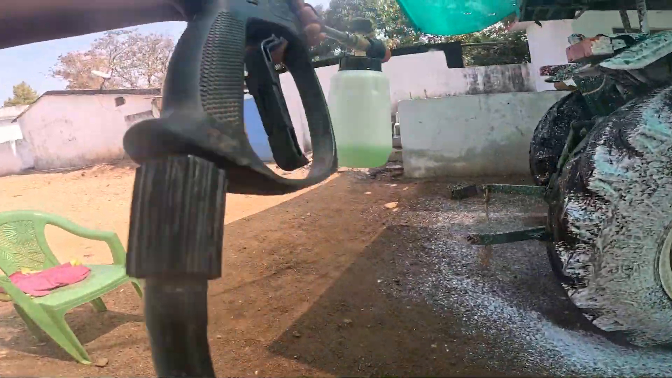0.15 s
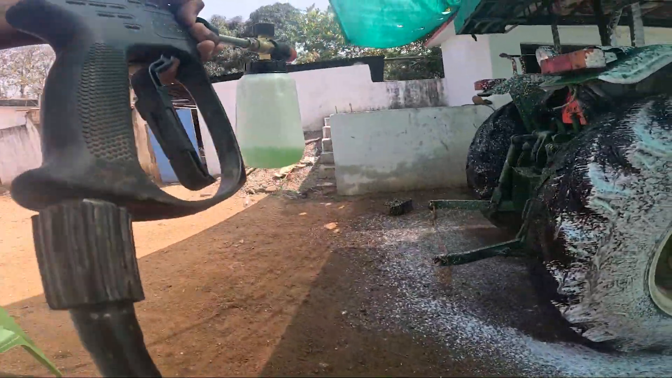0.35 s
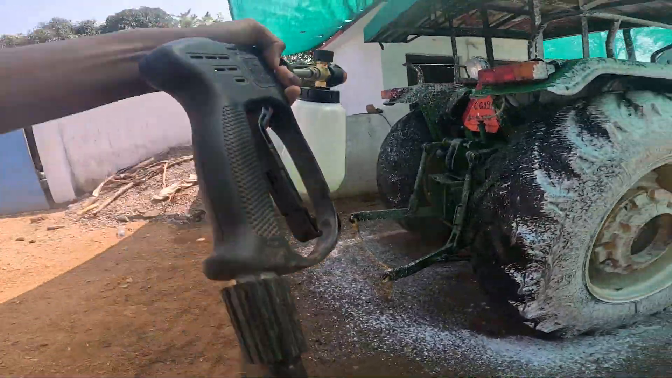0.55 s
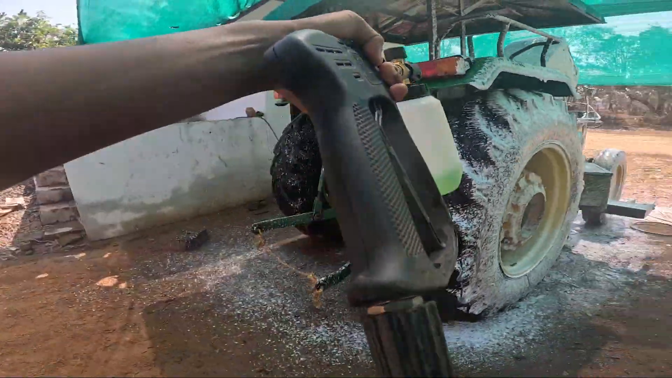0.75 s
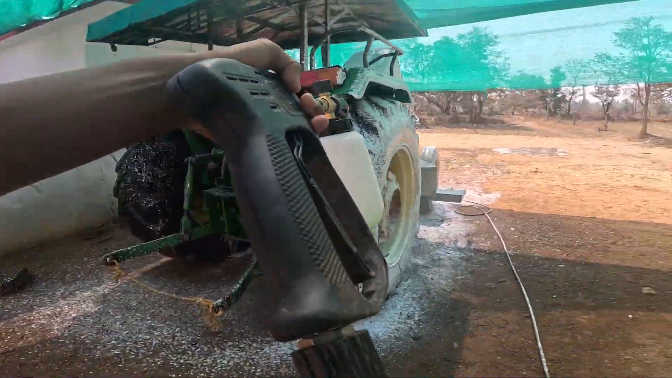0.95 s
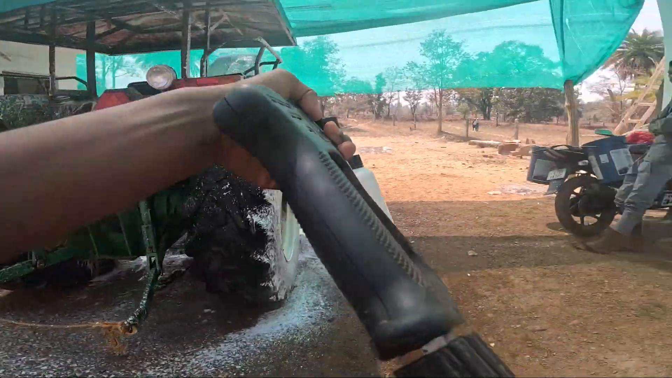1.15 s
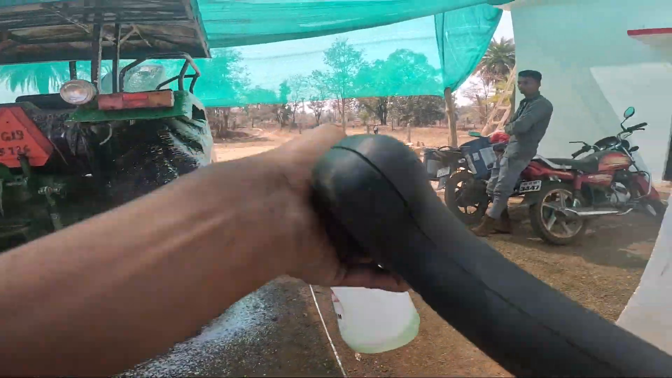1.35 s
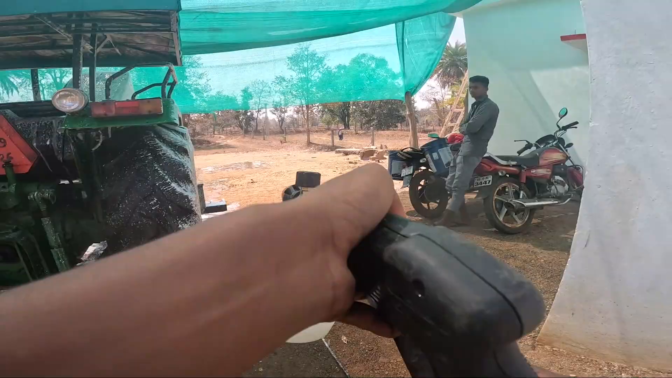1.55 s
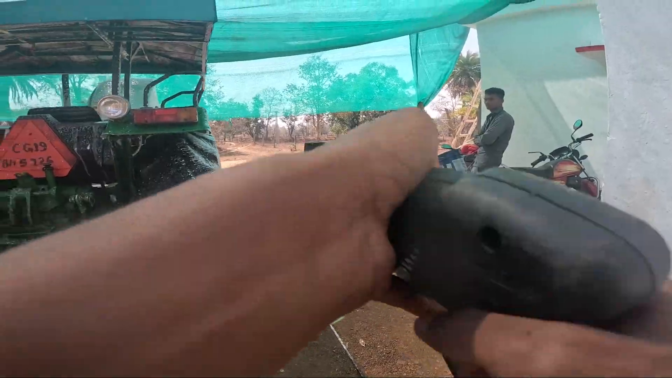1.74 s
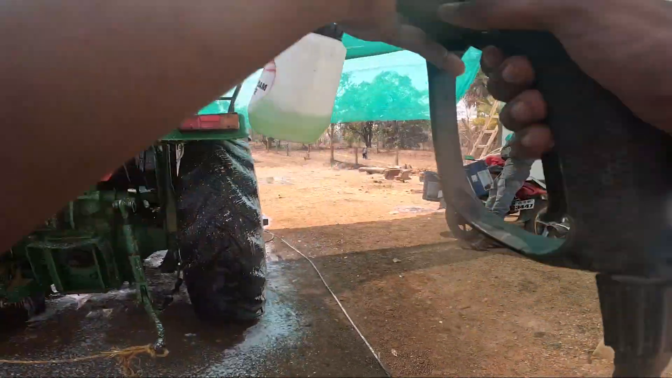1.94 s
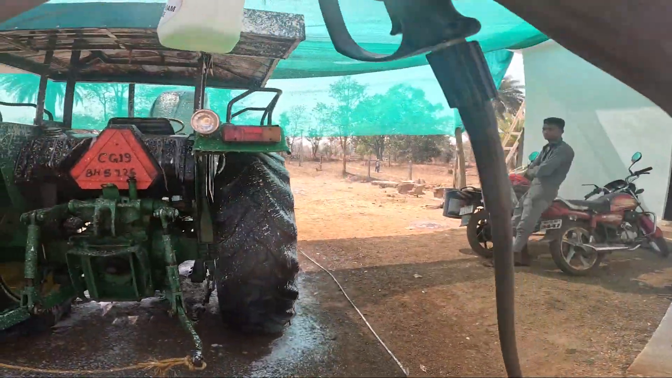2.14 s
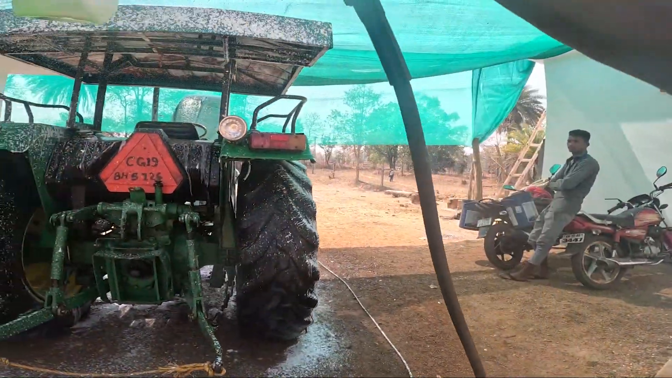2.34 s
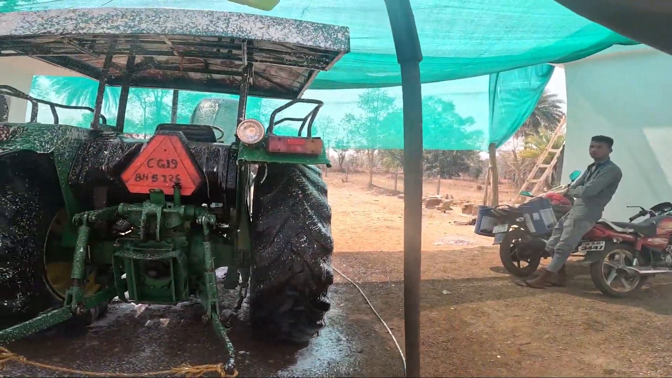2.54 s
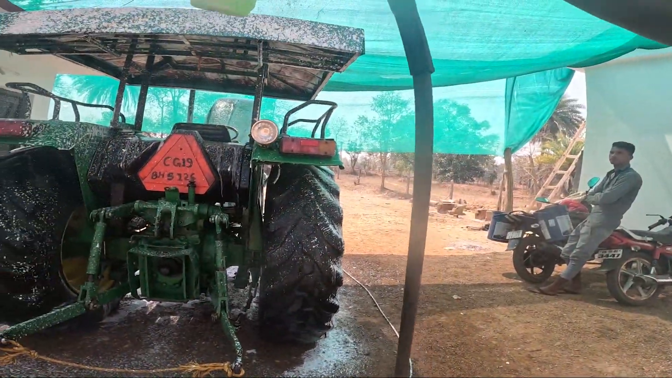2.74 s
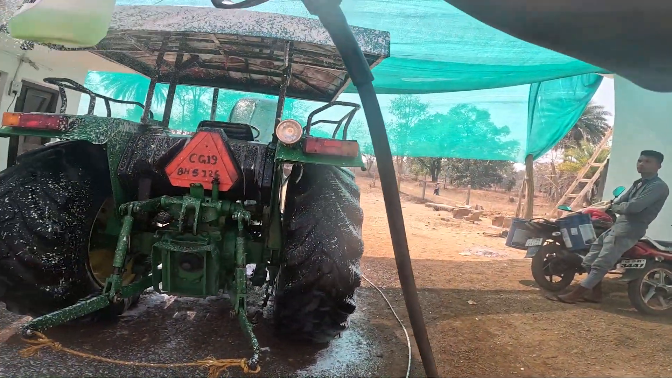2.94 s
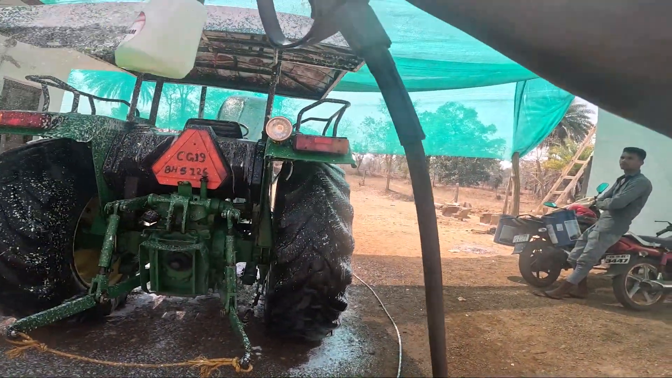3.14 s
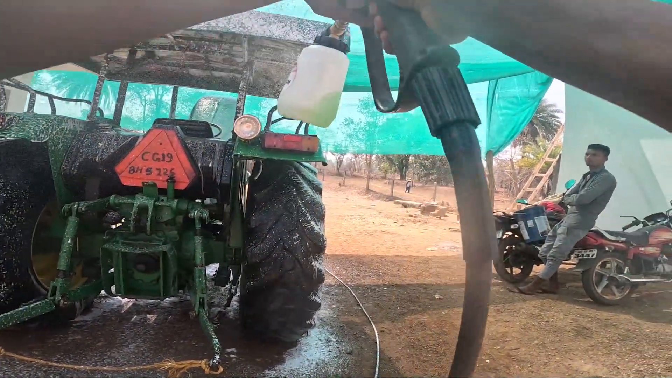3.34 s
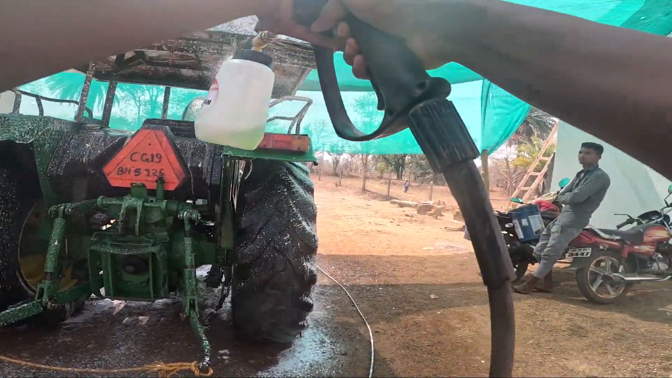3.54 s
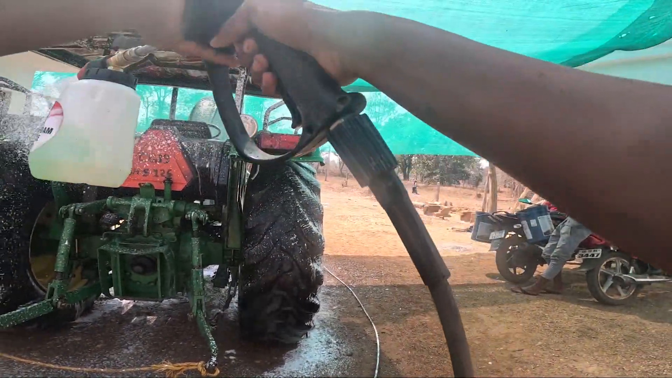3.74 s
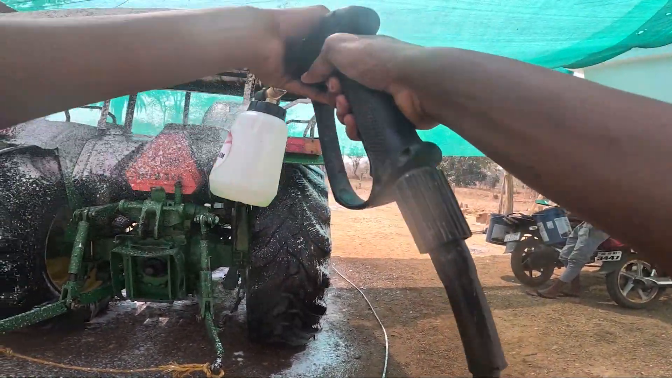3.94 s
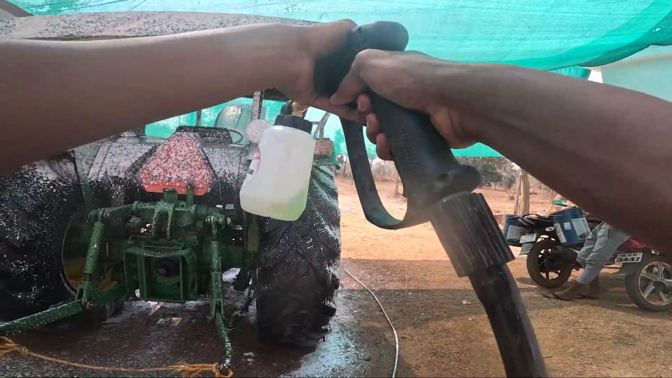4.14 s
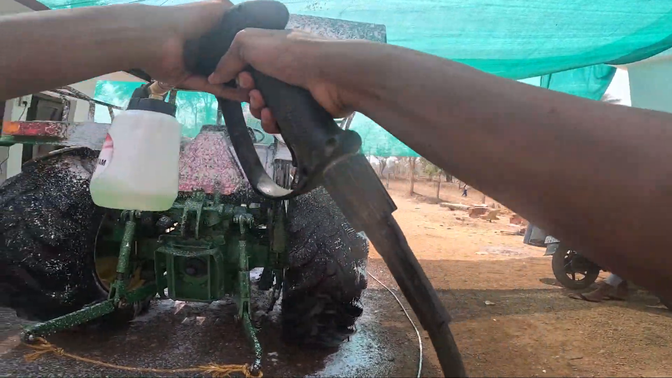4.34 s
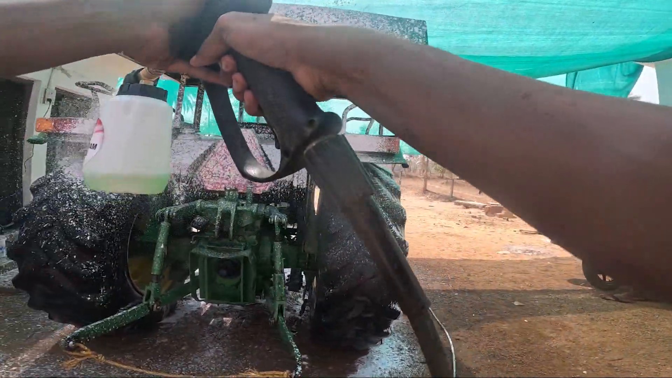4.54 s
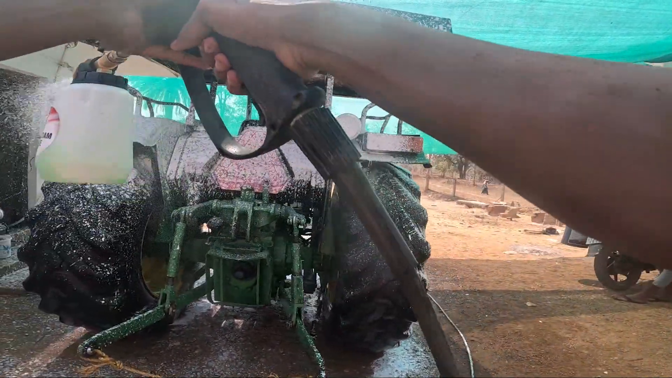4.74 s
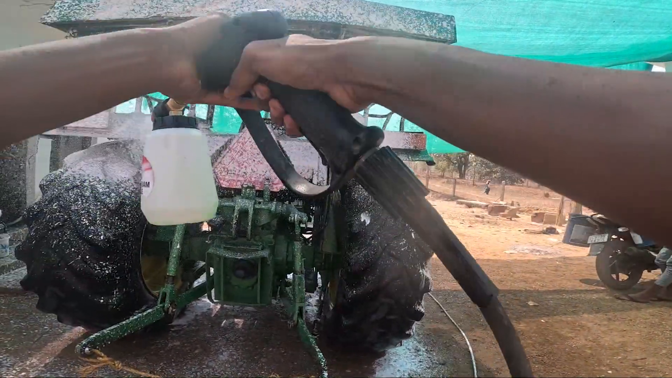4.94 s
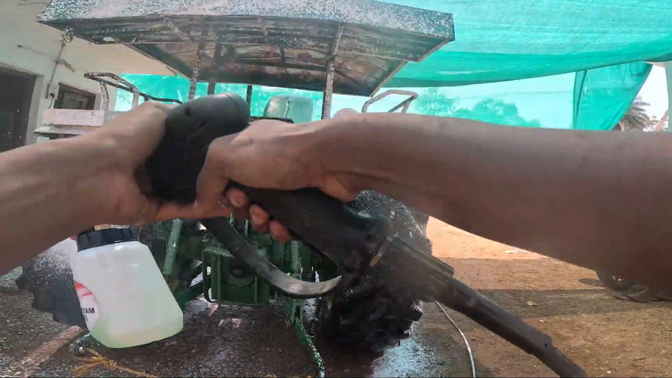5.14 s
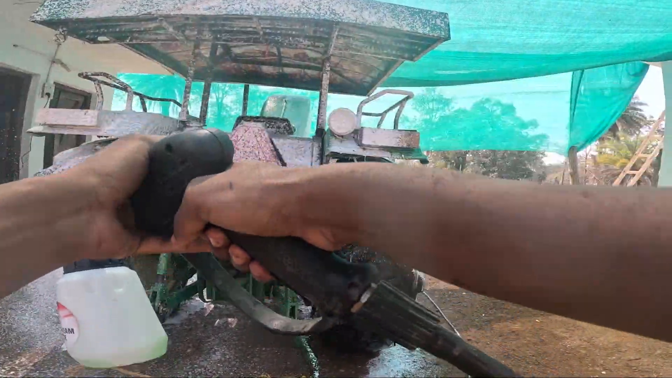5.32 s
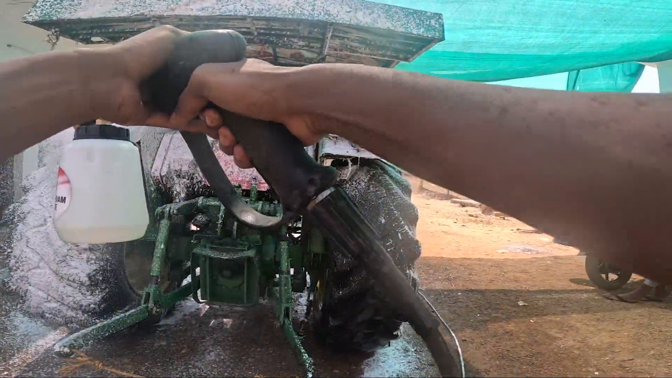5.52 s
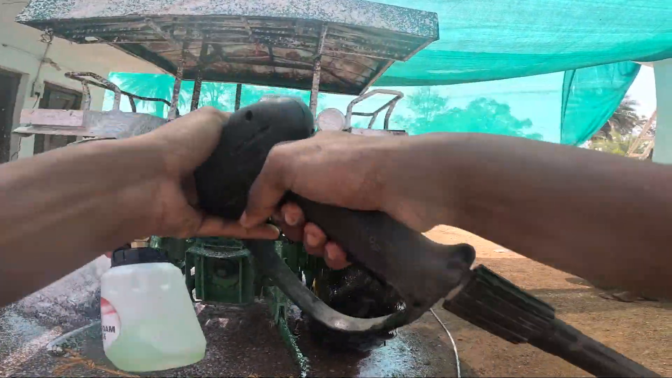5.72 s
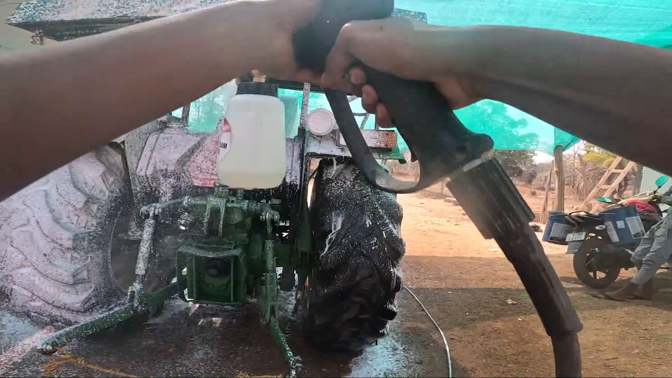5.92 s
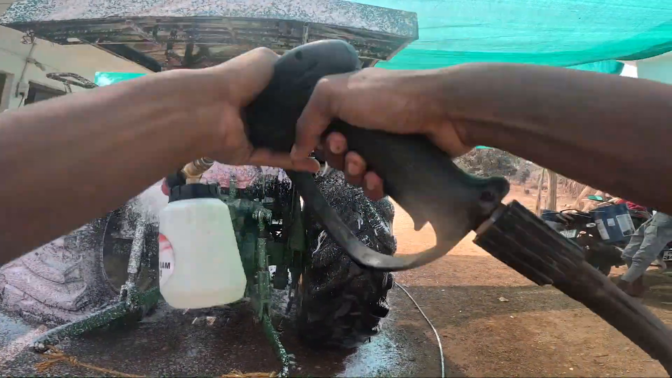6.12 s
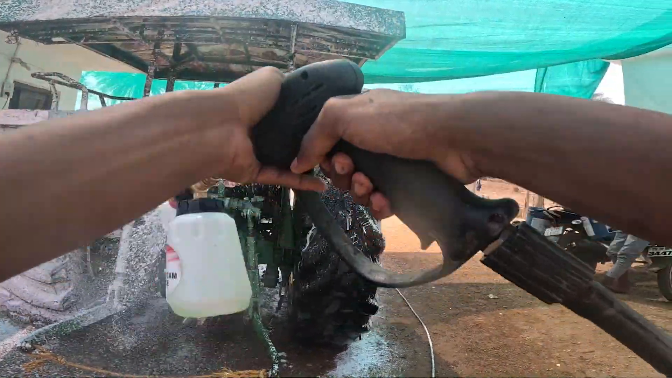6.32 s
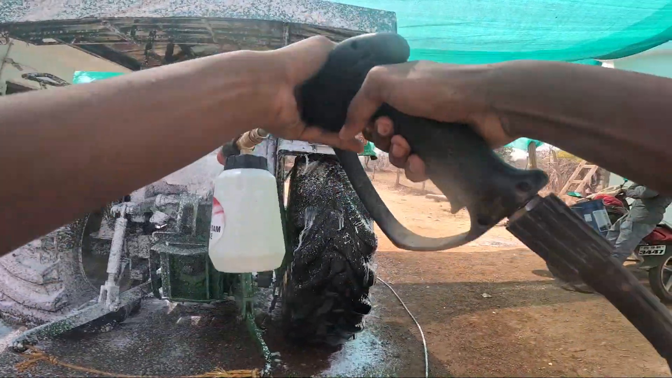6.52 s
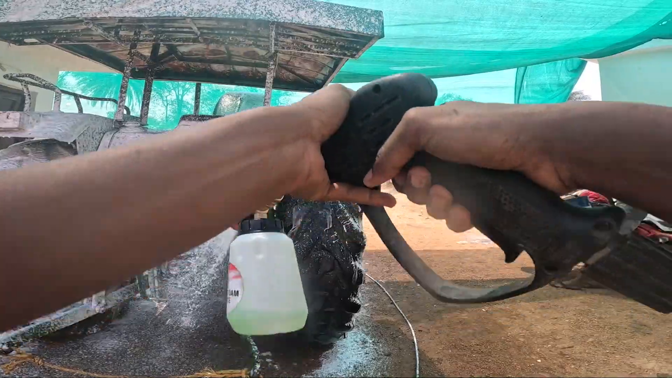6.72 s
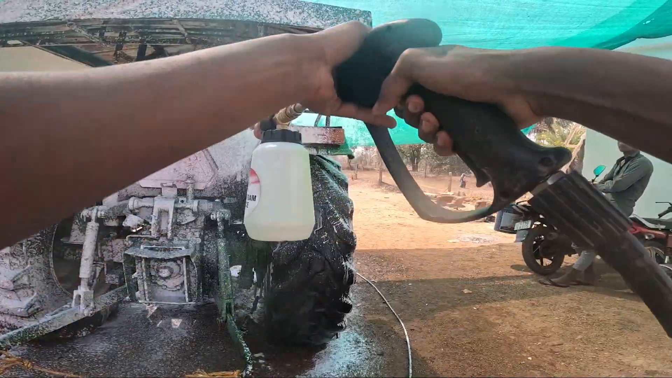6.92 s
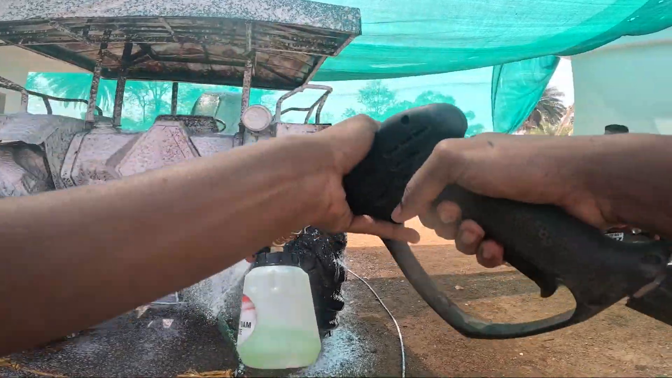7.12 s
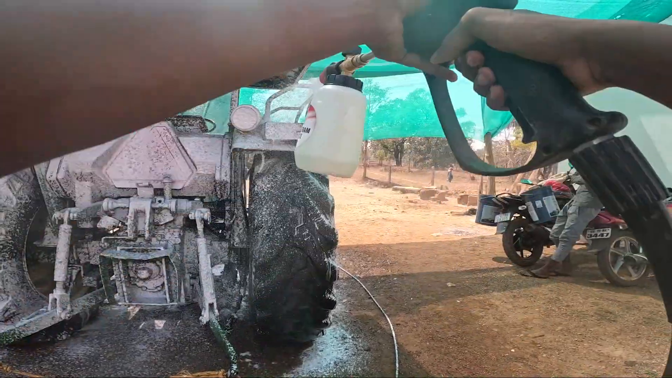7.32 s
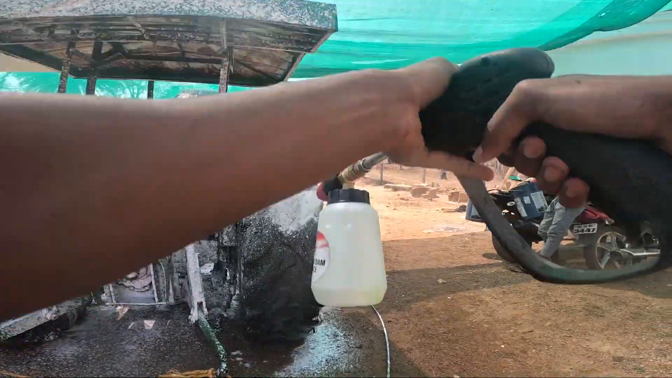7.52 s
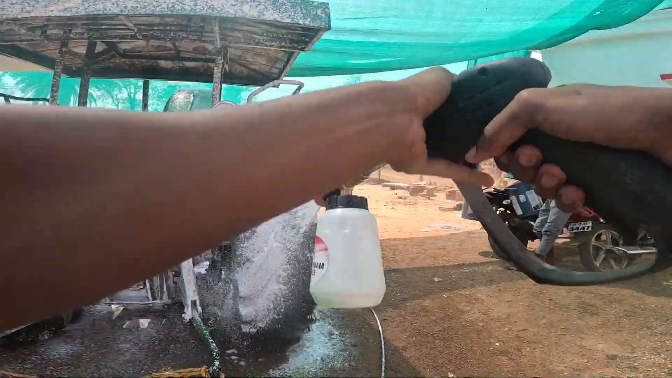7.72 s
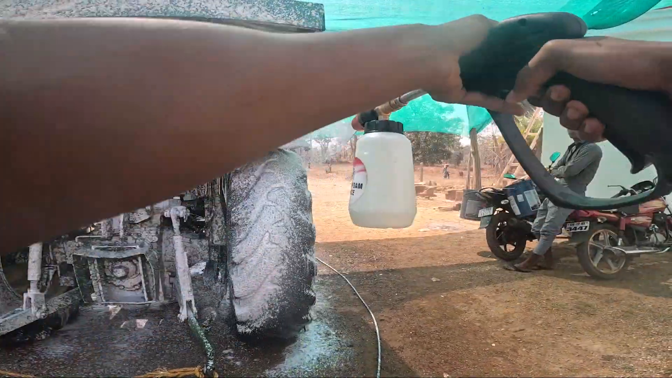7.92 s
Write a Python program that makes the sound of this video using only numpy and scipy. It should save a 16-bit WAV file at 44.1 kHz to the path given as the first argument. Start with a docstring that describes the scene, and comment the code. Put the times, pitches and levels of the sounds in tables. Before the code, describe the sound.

Low wind buffets and plastic clicks in a quiet yard with faint birds, then a pressure washer bursts on, hissing, whining and sizzling with foam.

```python
"""An open yard, where a pressure washer's foam gun is lifted and fired at a tractor.
First, filtered noise buffets the microphone, harmonic bird calls sound far off and modal clicks rattle
the plastic gun. Then the trigger opens: noise rings the hollow nozzle and hisses, the pump motor cuts in
as shaft harmonics with a whine, and grainy bright noise makes the foam sizzle. Echoes comb the spray."""
import sys
import numpy as np
from scipy import signal
from scipy.fft import rfft, irfft, next_fast_len
from scipy.io import wavfile

SR = 44100
rng = np.random.default_rng(int(sys.argv[2]) if len(sys.argv) > 2 else 0)


def unload_audio(sound):
    """Save the sound as a 16-bit wav file, at the path given as the first command line argument."""
    columns = np.transpose(np.atleast_2d(sound))
    # keep every value between -1 and 1, then stretch to whole-number steps
    steps = np.round(np.clip(columns, -1, 1) * 32767)
    wavfile.write(sys.argv[1], SR, steps.astype(np.int16))


N = 355887
TIME = np.arange(N) / SR

TRIGGER_S = 1.886
SPURT_S = 0.05  # length of the first spurt
# air moving past the microphone as it swings: time_s, rumble_db
WIND_RUMBLE = [(0, -41), (.09, -39), (.14, -35), (.75, -29), (.93, -35.5), (1.05, -30.5), (1.4, -34),
               (1.86, -44)]


def jet(lowered_m):
    """Hollow roar and broad hiss; the pressure stored in the hose gives a first spurt, then sags."""
    # nozzle's main resonance as the gun turns, before trim: time_s, level_db
    main_level = [(2.1, -22.5), (2.35, -24), (2.5, -25.5), (2.8, -25.5), (3.35, -23.5), (3.9, -23.5),
                  (4.2, -27), (4.7, -23.5), (5.0, -25.5), (5.7, -24), (6.1, -23), (6.65, -23.5),
                  (7.0, -24.5), (7.27, -21), (7.39, -28.5), (7.72, -22.5), (7.95, -27)]
    # slower layers, before trim: time_s, low_resonance_db, broad_hiss_db
    body_level = [(2.1, -28.5, -30.5), (2.55, -30, -34), (3.3, -29.5, -32), (3.8, -29, -33.5),
                  (4.4, -28.3, -32), (4.9, -29.5, -30.5), (5.4, -30, -31), (6.8, -28, -32.5),
                  (8.07, -29.5, -32.5)]
    # where the gun is held: time_s, left_over_right_db
    gun_side = [(2.0, -2.5), (3.0, -.7), (3.85, -0.5), (4.15, -3.5), (4.7, -.7), (5.5, 2.3), (6.1, -2),
                (6.7, -1.3), (8.07, -6)]
    # nozzle air modes: pitch_hz, width_hz, level_db, left_over_right_db, left_lead_rad
    low_modes = [(1158, 110, -5, 4.5, -0.24), (1353, 260, -6, 1.5, -0.81)]
    main_modes = [(2692, 230, 1, -0.21, -0.76), (2620, 405, -3, -1.5, -0.56)]
    high_modes = [(6414, 440, 7, 1.6, -0.27), (8540, 190, -7, 1.4, 0.032), (4400, 760, -9.5, 0.54, -.3)]
    # colour of the broad hiss: frequency_hz, relative_density_db
    hiss_colour = [(15, -5), (40, -1.5), (75, -1), (150, -5.5), (400, -3.5), (700, 1), (1000, 4.5),
                   (1900, 2), (3500, 0.5), (4600, 3), (5600, 0), (7400, -3), (9000, -3.5), (12000, -30),
                   (16000, -29)]
    # left-right likeness of the spray: frequency_hz, correlation
    spray_likeness = [(60, 0.89), (400, 1), (1300, 0.88), (2700, 0.92), (5000, 0.81), (15000, 0.88)]
    thump_db, thump_s = 8.5, 0.019
    sag_at_s, sag_half_s = 1.975, 0.033
    cough_db, cough_band_hz = -31, [1300, 2430]
    whistle_fade_db_per_s = 0.35

    spurt = swell(1.912, SPURT_S / 2)
    sag = swell(sag_at_s, sag_half_s)
    main_db, = in_time(main_level)
    low_db, hiss_db = in_time(body_level)
    main_db = main_db + 1.5 * spurt - 6.5 * sag
    low_db = low_db + thump_db * since_trigger(thump_s) + 1.6 * spurt + 0.77 * drift(4.9)
    hiss_db = hiss_db + 1.0 * spurt - 3.5 * np.sqrt(sag)

    # a lowered gun sounds further left: 15 dB per metre
    side_db = in_time(gun_side)[0] + 15 * lowered_m
    roar_gain = from_db(main_db + 0.82 + 0.15 * drift(31))
    roar = roar_gain * nozzle(main_modes, apart_db=-11.5) * pan(side_db + 0.2)
    roar += from_db(low_db - 0.2) * nozzle(low_modes, apart_db=-13.5)

    # the high whistle follows roar and hiss, and fades as the spraying goes on
    whistle_db = 0.5 * (hiss_db + main_db) - 4.0 - whistle_fade_db_per_s * (TIME - TRIGGER_S)
    whistle = from_db(whistle_db) * nozzle(high_modes, apart_db=-7.5)
    hiss = from_db(hiss_db + 4.0) * noise(hiss_colour, spray_likeness) * pan(0.6)

    # the first spurt coughs out the air in the nozzle
    breath = rms_one(cut(rng.standard_normal(N), cough_band_hz, "band"))
    cough = from_db(cough_db) * np.sqrt(spurt) * breath

    flutter = from_db(0.5 * drift(23))
    spray = valve() * flutter * (roar + whistle + hiss + cough)
    return reflections(spray, lowered_m, ground_db=-13, sway_m=0.06)


def nozzle(modes, apart_db):
    """Turbulence rings the nozzle's air modes, which reach left and right with different level and phase."""
    out = 0
    for hz, width_hz, db, side_db, left_lead_rad in modes:
        white = rng.standard_normal((3, N))
        turbulence = white[0] + from_db(apart_db) * white[1:]  # shared noise plus some of each side's own
        ring = resonate(resonate(turbulence, hz, width_hz), hz, width_hz * 4)
        right_delay_s = left_lead_rad / (2 * np.pi * hz)
        ring[1] = np.interp(TIME - right_delay_s, TIME, ring[1])
        out = out + from_db(db) * pan(side_db) * rms_one(ring)
    return rms_one(out)


def foam(lowered_m):
    """Foam tears into droplets: a fine sizzle with a crackle of bursting drops."""
    # steady sizzle, before trim: time_s, level_db
    steady_level = [(2.2, -39.5), (2.8, -42.5), (3.8, -39), (4.4, -38.5), (5.7, -38), (7.2, -34.5),
                    (8.07, -37)]
    # thick gobs of foam flare up, before trim: center_s, half_length_s, level_db
    flares = [(2.58, .012, -34), (4.176, 0.1, -30.5), (4.678, 0.049, -37), (4.96, 0.057, -38),
              (5.253, 0.045, -33.5), (5.53, 0.051, -34), (5.897, 0.031, -31), (6.035, 0.089, -40.5),
              (6.453, .035, -35), (6.626, 0.085, -34.5), (6.96, 0.094, -32), (7.303, .025, -30),
              (7.43, 0.052, -30.5), (7.556, 0.053, -32.5), (7.68, 0.089, -30.5), (7.905, 0.067, -27)]
    # colour of the sizzle: frequency_hz, relative_density_db
    sizzle_colour = [(3000, -17), (6500, -7.5), (8500, 0.5), (11400, 1), (12300, -5), (16000, -14)]
    fade_in_at_s, fade_in_s = 2.11, 0.073
    first_sizzle_db, drops_per_s = -38.5, 60

    # the bright sizzle fades in over 73 ms, a moment after the first spurt
    fade_in = np.clip((TIME - fade_in_at_s) / fade_in_s, 0, 1)
    # a lowered gun sizzles less: 25 dB per metre
    steady = fade_in * from_db(in_time(steady_level)[0] - 25 * lowered_m)
    steady = steady + from_db(first_sizzle_db) * since_trigger(SPURT_S)
    power = steady ** 2
    for s, half_s, db in flares:
        power = power + (from_db(db) * swell(s, half_s)) ** 2
    sizzle_db = 10 * np.log10(power + 1e-12) + 0.53 * drift(22)

    fizz = noise(sizzle_colour, 0.87) * from_db(2.9 * drift(180))
    drops = (rng.random(N) < drops_per_s / SR) * np.clip(rng.standard_normal(N), -2, 2)
    fizz = fizz + from_db(6) * cut(drops, [5000, 14000], "band")

    # thicker foam opens the top of the sizzle; the second filter runs backwards in time
    top = cut(fizz, 8950, "high", order=6)
    top = cut(top[:, ::-1], 10970, "high", order=6)[:, ::-1]
    top_lift_db = 2.5 + 0.14 * (sizzle_db + 35) + 1.2 * drift(12)
    fizz = fizz + (from_db(top_lift_db) - 1) * top
    sizzle = valve() * from_db(sizzle_db + 2.0) * fizz * pan(2.0)
    return reflections(sizzle, lowered_m, ground_db=-9, sway_m=0.049)


def spits():
    """Air pockets leave the nozzle with a sharp tick, a millisecond of bright noise."""
    # sharp spits of foam, before panning: start_s, peak_db
    spit_times = [(2.564, -14), (4.773, -17), (6.6323, -14), (6.9306, -20), (7.2888, -17), (7.3803, -6),
                  (7.4729, -15), (7.847, -14)]
    out, t = np.zeros(N), TIME[:SR // 100]
    for s, db in spit_times:
        burst = rng.standard_normal(len(t)) * np.exp(-t / 0.0013)
        tick = cut(burst, [6000, 13000], "band")
        start = round(s * SR)
        out[start:start + len(t)] += from_db(db) * tick / np.abs(tick).max()
    return out * pan(1.5)


def valve():
    """The flow opens from nothing to full within 2.9 milliseconds of the trigger."""
    return np.clip((TIME - TRIGGER_S) / 0.0029, 0, 1)


def valve_squeak():
    """A very high, unsteady whistle while the valve seat lifts."""
    # squeaks of the opening valve: start_s, length_s, start_hz, end_hz, level_db
    squeaks = [(1.903, .032, 14400, 14700, -35), (1.941, .018, 15200, 12500, -35)]
    return glides(squeaks, 0.012 * drift(200))


def motor():
    """The pump motor cuts in and runs up to speed: shaft harmonics with one strong whine."""
    # pump motor, before trim: time_s, whine_db, left_over_right_db
    motor_level = [(2.28, -23.5, 1), (3.27, -24, 0.5), (3.29, -23.5, 1.5), (4.38, -23.5, 1),
                   (4.62, -27.5, 0.5), (4.9, -26, 2), (6.09, -29, 3.5), (6.59, -28, 3), (7.92, -26.5, 2.5),
                   (8.05, -24.5, 2.0)]
    # shaft harmonics, the tenth being the whine: multiple_of_shaft_rate, relative_db
    orders = [(3, -44), (6, -26.5), (7, -20), (8, -25), (9, -23.5), (10, 1.5), (11, -21.5), (12, -41),
              (13, -25), (18, -55.5), (19, -26), (24, -27), (28, -24)]
    on_s, shaft_hz = 2.215, 71.95
    whine_db, side_db = in_time(motor_level)
    # from three quarters of full speed
    run_up = 1 - 0.25 * np.exp(-np.maximum(TIME - on_s, 0) / 0.0081)
    turns = np.cumsum(shaft_hz * run_up * (1 + 0.00033 * drift(1.0))) / SR
    out = 0
    for multiple, db in orders:
        waver_db = 0.63 * drift(30) if multiple == 10 else 2.0 * drift(0.84)
        tone = np.sin(2 * np.pi * (round(multiple) * turns + rng.random()))
        out = out + from_db(db + waver_db) * tone
    running = np.clip((TIME - on_s) / 0.056, 0, 1) ** 2
    return np.sqrt(2) * running * from_db(whine_db - 1.8) * out * pan(side_db)


def lowered():
    """The gun is swept down and up: metres by which each sweep shortens the path by the ground."""
    # sweeps about twice a second: lowest_point_s, path_shortening_m
    sweeps = [(5.36, .22), (5.861, .18), (6.318, 0.26), (6.76, .17), (7.22, .2), (7.73, .22)]
    return sum(metres * swell(s, 0.095) for s, metres in sweeps)


def reflections(x, lowered_m, ground_db, sway_m):
    """Echoes comb the spray, and the comb slides as the gun is waved about."""
    # the gun's mean height sets the way round by the ground: time_s, extra_path_m
    ground_path = [(1.9, 1.328), (2.15, 1.41), (2.75, 1.48), (3.1, 1.37), (3.85, 1.28), (4.75, 1.29),
                   (5.6, 1.23), (8.05, 1.32)]
    # echoes from arms, tractor and wall: mean_extra_path_m, level_db
    echoes = [(.7, -19.5), (1.902, -10.5), (3.098, -14), (4.599, -12), (7.297, -11)]
    ground_m = in_time(ground_path)[0] - lowered_m
    height_shift_m = ground_m - np.mean(ground_m)
    paths = [(ground_m, ground_db)]
    for m, db in echoes:
        paths.append((m + height_shift_m + sway_m * drift(0.6), db))
    fine = signal.resample_poly(x, 4, 1, axis=1)  # quarter-sample steps let the delays slide smoothly
    out, power = x, 1
    for metres, db in paths:
        read_at = np.round((TIME - metres / 343) * SR * 4)  # sound travels 343 m/s
        heard = np.clip(read_at, 0, fine.shape[1] - 1).astype(int)
        out = out + from_db(db) * fine[:, heard]
        power = power + from_db(2 * db)
    return out / np.sqrt(power)


def gun_clicks():
    """Each contact is a brief dying chatter in the plastic shell; heavy ones wake its low modes."""
    # clicks of gun and trigger, before echo: start_s, peak_db, low_body_db, ring_time_s
    clicks = [(0.155, -36, 4, 0.028), (0.947, -31.5, -18, 0.0076), (1.453, -28.5, -1, 0.03),
              (1.475, -27, 0, 0.016), (1.535, -33, -12, 0.02), (1.589, -30, -12, 0.02),
              (1.635, -31, -7, 0.017), (1.658, -38, -10, .03), (1.829, -14.5, 4, 0.011),
              (1.875, -27, 5.5, 0.014), (1.8847, -9.5, 7, 0.031)]
    # plastic shell of the gun: pitch_hz, width_hz, relative_db
    shell_modes = [(640, 1200, -2.5), (1250, 370, 4.5), (1650, 660, 3), (2370, 840, 3), (3900, 1100, -4.5),
                   (5600, 2900, -8.5), (9900, 4700, -14)]
    out, t = np.zeros(N), TIME[:SR // 8]
    for s, db, body_db, t60 in clicks:
        chatter = rng.standard_normal(len(t)) * from_db(-60 * t / t60)
        click = 0
        for k, (hz, width_hz, mode_db) in enumerate(shell_modes):
            gain = (-1) ** k * from_db(mode_db + body_db * (hz < 1500))  # neighbours in opposite phase
            click = click + gain * resonate(chatter, hz, width_hz)
        start = round(s * SR)
        out[start:start + len(t)] += from_db(db) * click / np.abs(click).max()
    return yard_echo(out, t60=0.042, wet_db=-15)


def rubbing():
    """Skin and hose scrape over the plastic in short, grainy strokes."""
    # hand on grip and hose, before grain: center_s, half_length_s, level_db
    rubs = [(0.163, 0.031, -47.5), (0.522, 0.025, -51), (0.796, 0.034, -49), (.9, 0.033, -55),
            (1.204, 0.018, -51), (1.568, 0.022, -48), (1.677, 0.026, -51), (1.817, 0.0071, -45),
            (1.887, 0.024, -41)]
    # colour of the scrape: frequency_hz, relative_density_db
    rub_colour = [(300, -18), (1000, -2.5), (1800, 5.5), (3000, 0.5), (5000, -4), (10000, -13),
                  (16000, -24)]
    strokes = sum(from_db(db) * swell(s, half_s) for s, half_s, db in rubs)
    grain = from_db(-2.0 + 5.2 * drift(90))
    return strokes * grain * noise(rub_colour, 0.58)


def rustle():
    """Cloth shifts as the arms swing the gun round: bright, grainy noise that follows the wind rumble."""
    # colour of the cloth: frequency_hz, relative_density_db
    rustle_colour = [(2000, -28), (6000, -1), (9000, 0), (11500, 2), (13000, -5), (16000, -11)]
    # -55 dB at a rumble of -30 dB, with 0.57 of its swing
    rustle_db = -55 + 0.57 * (in_time(WIND_RUMBLE)[0] + 30)
    grain = rms_one(from_db(2.5 * drift(250) + 3.1 * drift(28)))
    return from_db(rustle_db) * grain * noise(rustle_colour, 0.88)


def wind():
    """Eddies at the microphone as it swings: low rumble, buffeting and single gusts of filtered noise."""
    # the side that the wind strikes: time_s, left_over_right_db
    wind_side = [(0, -2), (.25, 2), (.36, -9.5), (.55, -1), (.72, -11), (.95, -1.5), (1.2, -7), (1.8, 0)]
    # colours of the two layers: frequency_hz, relative_density_db
    rumble_colour = [(15, -3), (40, 4), (70, -7), (110, -10.5), (200, -19.5), (500, -60)]
    buffet_colour = [(60, -14), (130, 0), (210, -3), (350, -12.5), (550, -28), (1000, -35), (2000, -68)]
    # single gusts, before panning: center_s, half_length_s, level_db, upper_edge_hz
    gusts = [(.122, 0.0045, -39, 383), (.178, 0.016, -27, 78), (.339, 0.0076, -25.5, 246),
             (.372, 0.0041, -21.5, 200), (.447, 0.0095, -18, 153), (.548, 0.0096, -29, 130),
             (.66, 0.0094, -26, 130), (.708, 0.03, -20, 300), (.713, 0.015, -29.5, 770),
             (.788, 0.021, -22.5, 260), (.85, 0.019, -29.5, 249), (1.15, 0.016, -35.5, 253),
             (1.194, 0.005, -27.5, 440), (1.71, 0.021, -31.5, 80.4), (3.884, 0.039, -44, 80),
             (4.148, .1, -49, 80.5), (4.66, 0.13, -43, 79)]
    rumble_db, = in_time(WIND_RUMBLE)
    side_db, = in_time(wind_side)
    # -47.5 dB at a rumble of -30 dB, with 0.94 of its swing
    buffet_db = -47.5 + 0.94 * (rumble_db + 30) + 1.5 * drift(8.2)
    moving = np.clip((1.95 - TIME) / 0.048, 0, 1)  # rumble and buffeting end at 1.95 s
    rumble = from_db(rumble_db) * noise(rumble_colour, 0.84)
    buffet = from_db(buffet_db) * noise(buffet_colour, 0.96)
    out = moving * (rumble + buffet)

    white = rng.standard_normal((2, N))
    for k, (s, half_s, db, edge_hz) in enumerate(gusts):
        near = np.abs(TIME - s) < 10 * half_s
        eddy = cut(white[k % 2, near], [edge_hz / 3, edge_hz], "band", order=3)
        shape = swell(s, half_s)[near]
        eddy_rms = np.sqrt(np.average(eddy ** 2, weights=shape ** 2))
        out[:, near] += from_db(db) * shape * eddy / eddy_rms
    return out * pan(side_db)


def birds():
    """A nasal caller whose harmonics scoop up, hold and sag, and some thin, raspy chirps."""
    # nasal calls, before echo: start_s, length_s, pitch_hz, scoop_share, fall_share, level_db
    calls = [(-.16, 0.21, 985, .3, 0.083, -54.5), (0.343, .21, 1007, .45, .12, -51.5),
             (0.949, 0.15, 949, .45, 0.018, -53), (1.13, 0.059, 875, 0, 0.082, -53)]
    # make-up of the nasal voice: harmonic, relative_db
    harmonics = [(2, 1), (3, 2.5), (4, -8), (5, -7)]
    # thin sliding chirps, before echo: start_s, length_s, start_hz, end_hz, level_db
    chirps = [(.2, 0.074, 4400, 4800, -53), (0.486, 0.1, 6100, 5700, -52), (.52, 0.2, 5400, 4950, -52),
              (.84, .07, 6800, 6200, -54), (1.06, .06, 6050, 5800, -54), (1.1, .04, 5100, 4000, -49),
              (1.255, .04, 6200, 5900, -50), (1.277, 0.064, 5200, 4450, -43),
              (1.49, 0.047, 5200, 4270, -52)]
    scoop_s, edge_s = 0.017, 0.013
    song, waver, tremble_db = np.zeros(N), 0.012 * drift(145), 2.6 * drift(70)
    for s, length, hz, scoop, fall, db in calls:
        on = (TIME > s) & (TIME < s + length)
        age = TIME[on] - s
        bend = scoop * np.exp(-age / scoop_s) + fall * (age / length) ** 1.3
        phase = 2 * np.pi * np.cumsum(hz * (1 - bend + waver[on])) / SR
        envelope = np.minimum(np.minimum(age, length - age) / edge_s, 1)
        voice = sum(from_db(level_db) * np.sin(round(k) * phase) for k, level_db in harmonics)
        song[on] += envelope * from_db(db + tremble_db[on]) * voice
    song = cut(song + glides(chirps, 0.036 * drift(380)), 1760, "high", order=10)
    return from_db(0.5) * yard_echo(song, t60=0.21, wet_db=-3.5)


def yard_air():
    """The steady bed of the open yard: wide coloured noise whose level wanders slowly."""
    # colour of the yard: frequency_hz, relative_density_db
    yard_colour = [(180, -5), (300, 0.5), (420, 1.5), (650, -8.5), (1120, -17), (1350, -11), (1750, -5.5),
                   (3300, -9.5), (4900, -9.5), (6500, -16), (8400, -22.5), (11300, -23), (15500, -38)]
    return from_db(-50 + 1.0 * drift(1.6)) * noise(yard_colour, 0.66)


def yard_echo(x, t60, wet_db):
    """Scattered reflections as decaying noise, different at each ear."""
    t = TIME[:SR // 2]
    scatter = cut(rng.standard_normal((2, len(t))), 9000, "low")
    scatter = scatter * from_db(-60 * t / t60) * (t > 0.006)
    scatter /= np.sqrt(np.sum(scatter ** 2) / 2)
    return x + from_db(wet_db) * signal.fftconvolve(x[None], scatter, axes=1)[:, :N]


def glides(rows, waver):
    """Short whistles that swell and fade while they slide in pitch."""
    out = np.zeros(N)
    for s, length, start_hz, end_hz, db in rows:
        on = (TIME > s) & (TIME < s + length)
        along = (TIME[on] - s) / length
        hz = (1 + waver[on]) * (start_hz + (end_hz - start_hz) * along)
        out[on] += from_db(db) * np.sin(np.pi * along) * np.sin(2 * np.pi * np.cumsum(hz) / SR)
    return out


def noise(spectrum, likeness):
    """Stereo noise of a given colour and left-right correlation (a number or a spectrum); rms 1."""
    size = next_fast_len(N)
    hz = np.arange(size // 2 + 1) * SR / size
    alike = np.clip(likeness if np.isscalar(likeness) else at_hz(likeness, hz), -1, 1)
    mid, side = rfft(rng.standard_normal((2, size)))
    both = np.sqrt(1 + alike) * mid + np.sqrt(1 - alike) * side * [[1], [-1]]
    coloured = both * from_db(at_hz(spectrum, hz)) * (hz > 10)
    return rms_one(irfft(coloured, size)[:, :N])


def resonate(x, hz, width_hz):
    """Two-pole resonance with gain 1 on top."""
    r = np.exp(-np.pi * width_hz / SR)
    feed = np.array([1, 0, -1]) * (1 - r * r) / 2
    feedback = [1, -2 * r * np.cos(2 * np.pi * hz / SR), r * r]
    return signal.lfilter(feed, feedback, x + 1e-18)


def cut(x, hz, kind, order=2):
    """Butterworth filter."""
    sos = signal.butter(order, np.clip(hz, 10, 0.45 * SR), kind, fs=SR, output="sos")
    return signal.sosfilt(sos, x)


def drift(rate_hz):
    """Random wander of spread 1: noise smoothed by two equal poles, made at every 40th sample."""
    r = np.exp(-80 * np.pi * rate_hz / SR)
    white = rng.standard_normal(N // 40 + 2002)
    slow = signal.lfilter([1], [1, -2 * r, r * r], white)[2000:]  # skip the filter's start
    return np.interp(np.arange(N) / 40, np.arange(len(slow)), rms_one(slow))


def swell(s, half_s):
    """A bell-shaped rise and fall of height 1."""
    return np.exp(-0.5 * np.minimum(((TIME - s) / half_s) ** 2, 100))


def since_trigger(decay_s):
    """Dies away from 1 once the trigger is pulled."""
    return np.exp(-np.clip((TIME - TRIGGER_S) / decay_s, 0, 50))


def in_time(rows):
    """Each column of a curve at every sample."""
    s, *columns = np.transpose(rows)
    return [np.interp(TIME, s, c) for c in columns]


def at_hz(points, hz):
    """Read a spectrum on a log-frequency axis."""
    f, value = np.transpose(points)
    return np.interp(np.log(hz + 1), np.log(f), value)


def pan(db):
    """Left and right gains for a level difference, left over right."""
    return from_db(np.array([[0.5], [-0.5]]) * db)


def from_db(db):
    """Decibels to gain."""
    return 10 ** (np.asarray(db) / 20)


def rms_one(x):
    """Scale to unit power."""
    return x / np.sqrt(np.mean(x ** 2) + 1e-20)


def scene():
    """Washer, handling, wind and the yard around them."""
    lowered_m = lowered()
    washer = jet(lowered_m) + foam(lowered_m) + spits() + valve_squeak() + motor()
    # rustle and yard air dip briefly before the trigger
    dip = from_db(-6 * swell(1.715, 0.01))
    handling = gun_clicks() + rubbing() + dip * rustle()
    return washer + handling + wind() + birds() + dip * yard_air()


def record(dry):
    """The top is cut steeply above 15.72 kHz by an elliptic low-pass."""
    return signal.sosfilt(signal.ellip(14, 0.1, 90, 15720, fs=SR, output="sos"), dry)


dry = scene()
out = record(dry)
unload_audio(out)
```